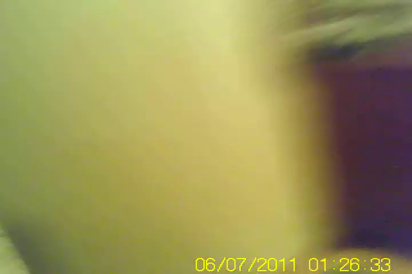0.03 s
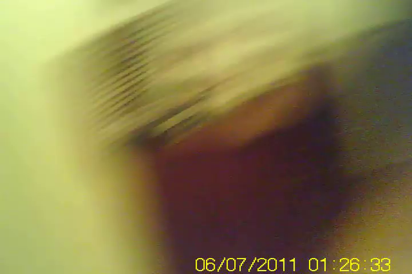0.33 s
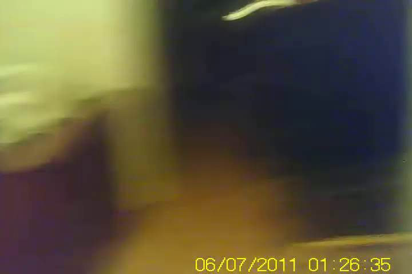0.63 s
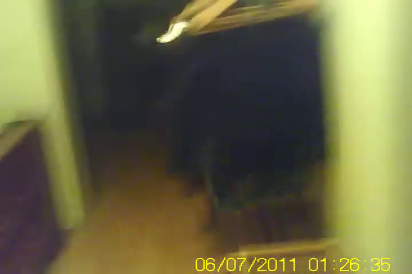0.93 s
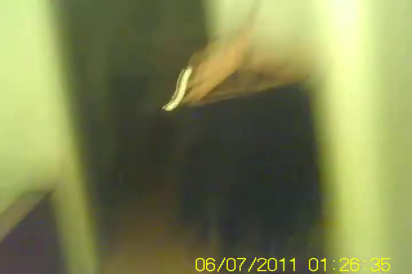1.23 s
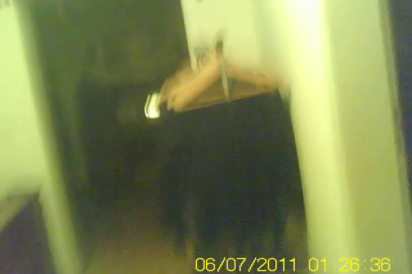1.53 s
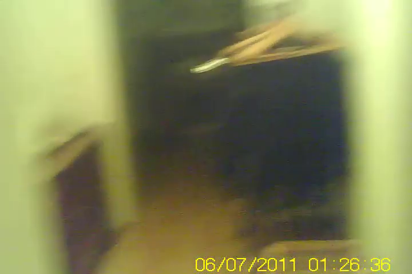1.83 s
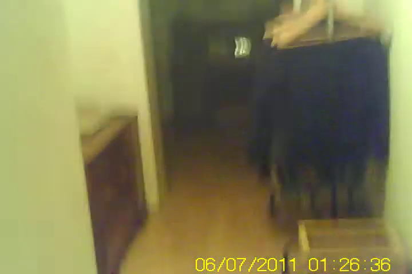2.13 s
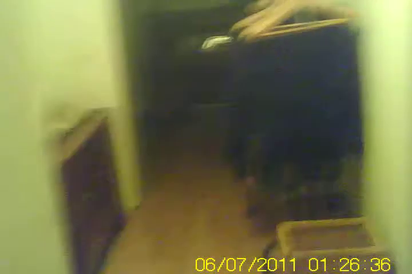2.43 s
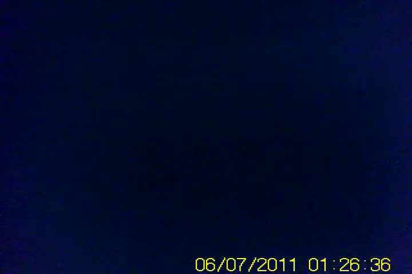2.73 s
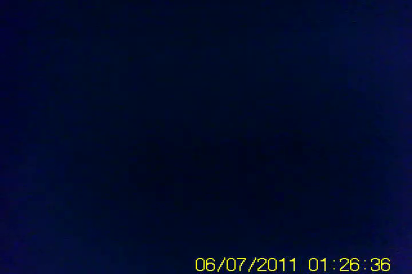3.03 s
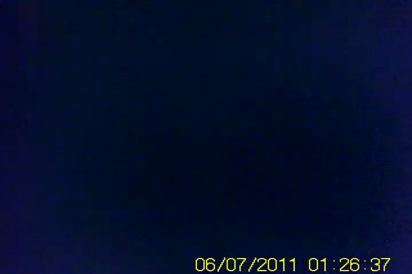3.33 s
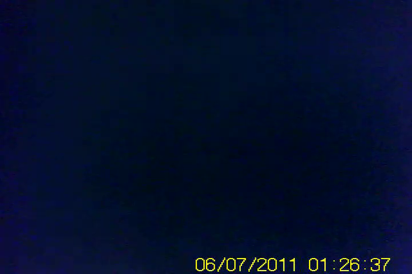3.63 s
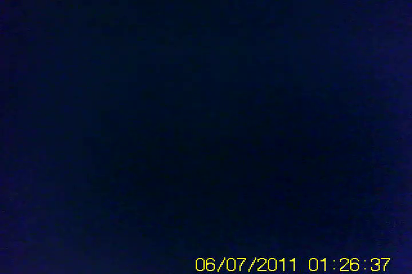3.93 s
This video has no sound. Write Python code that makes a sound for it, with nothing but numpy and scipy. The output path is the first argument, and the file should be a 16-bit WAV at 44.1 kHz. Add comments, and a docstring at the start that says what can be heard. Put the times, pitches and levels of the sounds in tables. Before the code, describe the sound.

A light switch is flipped once with a sharp click in a quiet room. Before it, a handheld microphone picks up soft bumps and rustles, and a faint thud and tick follow. Hiss, low rumble and hum continue throughout.

```python
"""A light switch is flipped in a quiet room: a dull knock as the rocker tips over, then a sharp snap
as the contact lands. Before that, the small handheld camera being carried through the room makes soft
bumps and rustles; near the end come a low thud, a little more rustling and a faint double tick.
These sounds have a short room echo. Microphone hiss, low rumble and a drifting mains hum run throughout."""
import sys
import numpy as np
from scipy import signal
from scipy.fft import rfft, irfft
from scipy.io import wavfile

SR = 44100
rng = np.random.default_rng(int(sys.argv[2]) if len(sys.argv) > 2 else 0)


def master(y):
    """Save y as 16-bit WAV."""
    cut = np.clip(np.atleast_2d(y).T, -1, 1)
    pcm = np.round(cut * 32767)  # scale
    wavfile.write(sys.argv[1], SR, pcm.astype(np.int16))


N = 176400
TIME = np.arange(N) / SR
FREQS = np.fft.rfftfreq(N, 1 / SR)

# Ringing notes of the knock; a decay is the time to fall 60 dB (pitch [Hz], level [dB], decay [s])
KNOCK_NOTES = [(680, -39.5, 0.026), (972, -36, 0.019), (1670, -39.5, 0.027), (2730, -45, 0.013)]
# Ringing notes of the snap (pitch [Hz], level [dB], decay [s])
SNAP_NOTES = [(1160, -60, 0.089), (1916, -36.5, 0.015), (2650, -41, 0.0099), (3850, -40, 0.015),
              (4180, -40, 0.016), (6780, -41, 0.019), (7700, -49, 0.043), (7870, -39, .017),
              (8600, -44.5, .022), (9410, -43, 0.027)]
# Tone colour of the rattling plastic (frequency [Hz], relative level [dB])
RATTLE_COLOUR = [(300, -9), (900, 6), (2000, 6.5), (4000, -10), (5500, 4), (7500, 3), (10000, -5),
                 (12000, -14.5)]
# Dull bumps of the hand (start [s], level [dB], centre [Hz], decay [s], width [octaves])
HAND_BUMPS = [(.085, -61, 440, 0.14, 0.17), (.108, -56, 586, .12, 0.1), (.675, -57, 600, 0.24, 0.59),
              (.845, -50.5, 1150, .055, .6), (.858, -52.5, 850, 0.056, .15),
              (1.085, -57.5, 1090, 0.059, .3), (1.092, -52, 550, .18, .35)]
# Low thuds of the carried camera (middle [s], level [dB], pitch [Hz], half length [s])
CARRY_THUDS = [(0.193, -43, 33.8, .08), (1.114, -40, 76, 0.017), (1.203, -43, 70, .025),
               (3.119, -43, 55, 0.022)]
# The two faint ticks (start [s], level [dB], decay [s])
HAND_TICKS = [(3.923, -56, 0.03), (3.9272, -46.5, 0.046)]
# Tone colour of a tick (frequency [Hz], relative level [dB])
TICK_COLOUR = [(300, -3), (600, 2), (1300, -2), (2200, -1), (3700, -3), (5000, -9), (6700, -8.5),
               (9500, -16), (12000, -35)]
# Brushing strokes (middle [s], level [dB], half length [s], centre [Hz], width [octaves])
RUSTLE_STROKES = [(0.277, -63, 0.047, 1420, 0.74), (.31, -66.5, 0.044, 3700, 0.22),
                  (.32, -68.5, 0.048, 6400, .25), (0.707, -63.5, 0.012, 3300, .25),
                  (0.733, -60, 0.051, 1900, 0.71), (1.51, -73, .04, 3600, .15),
                  (1.505, -71, 0.056, 6030, 0.17), (2.125, -68, 0.075, 3270, 0.56),
                  (3.243, -65, 0.019, 1600, 0.7), (3.38, -73.5, 0.13, 6240, 0.16)]
# Tiny squeaks from rubbing (middle [s], level [dB], half length [s], centre [Hz])
SQUEAK_STROKES = [(.63, -65, .012, 2500), (.699, -57.5, .01, 3600)]
# Tones of the mains hum (pitch [Hz], full level [dB], swells at [s], fades at [s])
HUM_TONES = [(50, -50, 0, 3.5), (100, -54, .2, 3.2), (250, -73, .1, 3.9), (300, -63.8, 2.95, 4.1),
             (700, -78, 1.6, 3.9), (800, -72.5, 1.3, 2.95), (850, -70, 3.1, 3.8), (1050, -78.5, 1.3, 3.5),
             (1200, -75.5, 1.15, 2.85)]
# Steady electrical whine (pitch [Hz], level [dB])
WHINE_TONES = [(5600, -83), (7400, -83)]
# Tone colour of the rumble (frequency [Hz], relative level [dB])
RUMBLE_COLOUR = [(3, -4.5), (12, 3), (25, -0.5), (40, -5), (75, -9.5), (110, -14), (150, -23.5),
                 (250, -56.5)]
# How the rumble rises and falls (time [s], relative level [dB])
RUMBLE_SWELLS = [(0, -1.5), (.25, 3.5), (.7, -3.5), (1.15, 1), (1.6, -2.5), (2.0, 2), (2.4, -3), (3.1, 1.5),
                 (3.9, -3.5)]
# Tone colour of the hiss (frequency [Hz], relative level [dB])
HISS_COLOUR = [(60, -17), (130, -0.5), (220, -4.5), (400, -9), (600, -11.5), (1000, -15.5), (1800, -16.5),
               (3000, -20.5), (4800, -23.5), (6000, -23.5), (7200, -25), (9300, -25), (10000, -27.5),
               (11000, -34), (11600, -55.5), (12100, -67)]
# Narrow resonances in the hiss (centre [Hz], half width [Hz], level [dB])
HISS_RESONANCES = [(3569, 70, -82.5), (6780, 230, -85), (7590, 210, -86.5)]

KNOCK_S, SNAP_S = 2.1803, 2.2005


def amp(db):
    """Turns decibels into a number to multiply by."""
    return 10 ** (np.asarray(db) / 20)


def unit(x):
    """Scales a signal to an average (rms) level of one."""
    return x / np.sqrt(np.mean(x ** 2) + 1e-20)


def colour(points):
    """A gain for every frequency, drawn through (frequency [Hz], level [dB]) points."""
    hz, db = np.transpose(points)
    return amp(np.interp(np.log(FREQS + 1), np.log(hz + 1), db))


def band(hz, octaves):
    """A bell-shaped gain that keeps the frequencies near hz."""
    return np.exp(-.5 * (np.log2((FREQS + 1) / hz) / octaves) ** 2)


def noise(gain):
    """Noise of level one, shaped by a gain for every frequency."""
    return unit(irfft(rfft(rng.standard_normal(N)) * gain, N))


def tone(hz):
    """A pure tone of level one that starts anywhere in its cycle."""
    return np.sqrt(2) * np.sin(2 * np.pi * (hz * TIME + rng.random()))


def strike(start, decay, rise):
    """The loudness of a hit: it rises quickly and falls 60 dB in `decay` seconds."""
    age = np.maximum(TIME - start, 0)
    return np.minimum(age / rise, 1) * np.exp(-np.log(1000) * age / decay)


def ring(start, notes, rise):
    """A struck object rings with several notes, each dying away at its own speed."""
    return sum(amp(db) * strike(start, decay, rise) * np.sin(2 * np.pi * hz * (TIME - start))
               for hz, db, decay in notes)


def switch_knock():
    """The rocker knocks against the wall plate: a few short notes over a dull burst of noise."""
    body = amp(-53) * strike(KNOCK_S, decay=.17, rise=.001) * noise(band(850, octaves=.55))
    return ring(KNOCK_S, KNOCK_NOTES, rise=.0004) + body


def switch_snap():
    """The contact lands with a bright crack that rings and rattles the plastic."""
    crack_delay_s, crack_width_s, crack_hz = .000448, .00036, 7590
    t = TIME - SNAP_S - crack_delay_s
    crack = amp(-23) * np.exp(-(t / crack_width_s) ** 2) * np.sin(2 * np.pi * crack_hz * t)
    rattle = amp(-39.5) * strike(SNAP_S, decay=.026, rise=.00035) * noise(colour(RATTLE_COLOUR))
    return crack + ring(SNAP_S, SNAP_NOTES, rise=.00017) + rattle


def handling():
    """The hand that holds the camera makes dull bumps, low thuds and small ticks."""
    bumps = sum(amp(db) * strike(start, decay, rise=.0013) * noise(band(hz, octaves))
                for start, db, hz, decay, octaves in HAND_BUMPS)
    thuds = sum(amp(db) * np.exp(-((TIME - middle) / half_length) ** 2) * tone(hz)
                for middle, db, hz, half_length in CARRY_THUDS)
    ticks = sum(amp(db) * strike(start, decay, rise=.001) * noise(colour(TICK_COLOUR))
                for start, db, decay in HAND_TICKS)
    return bumps + thuds + ticks


def rustles():
    """Cloth or skin brushes by in short, grainy strokes, with two tiny squeaks."""
    def stroke(middle, db, half_length, hz, octaves):
        swell = np.exp(-.5 * ((TIME - middle) / half_length) ** 2)
        return amp(db) * swell * noise(band(hz, octaves))

    grain_s, grain_db = .0024, 1  # fast, random wobbles in level make the strokes grainy
    grain_times = np.arange(0, N / SR, grain_s)
    wobble = rng.standard_normal(N)[:len(grain_times)]
    grain = unit(amp(-grain_db * np.interp(TIME, grain_times, wobble)))
    brushing = grain * sum(stroke(*row) for row in RUSTLE_STROKES)
    squeaks = sum(stroke(*row, octaves=.03) for row in SQUEAK_STROKES)  # narrow enough to have a pitch
    return brushing + squeaks


def mains_hum():
    """Mains tones swell and fade as the camera moves, under a thin, steady whine."""
    fade_s, faded_db = .3, -12
    sound = sum(amp(db) * tone(hz) for hz, db in WHINE_TONES)
    for hz, db, start, end in HUM_TONES:
        swell = np.clip(.5 + np.minimum(TIME - start, end - TIME) / fade_s, 0, 1)
        sound += amp(db + faded_db * (1 - swell)) * tone(hz)
    return sound


def rumble():
    """A low rumble rises and falls over a flutter too deep to hear."""
    level_db = -49.5 + np.interp(TIME, *np.transpose(RUMBLE_SWELLS))
    return amp(level_db) * noise(colour(RUMBLE_COLOUR)) + amp(-44.5) * tone(hz=9.1)


def microphone_hiss():
    """The microphone hisses steadily, with a few narrow resonances in the treble."""
    resonances = sum(amp(db) * noise(1 / (1 + ((FREQS - hz) / half_width) ** 2))
                     for hz, half_width, db in HISS_RESONANCES)
    return amp(-57.5) * noise(colour(HISS_COLOUR)) + resonances


def room_echo(sound):
    """A furnished room gives a short echo whose treble dies first."""
    mids = noise(band(830, octaves=1.0)) * strike(0, decay=.38, rise=.0033)
    treble = noise(band(6500, octaves=1.1)) * strike(0, decay=.15, rise=.0032)
    tail = amp(-19.5) * mids / np.linalg.norm(mids) + amp(-16) * treble / np.linalg.norm(treble)
    return signal.fftconvolve(sound, tail)[:N]


def scene():
    """Adds up everything at the one microphone; only the short sounds get an echo."""
    background = mains_hum() + rumble() + microphone_hiss()
    events = switch_knock() + switch_snap() + handling() + rustles()
    return (events + room_echo(events) + background)[None]


def record(dry):
    """The camera cuts off the highest treble."""
    cutoff_hz = 12150
    low_pass = signal.firwin(301, cutoff_hz, window=("kaiser", 8), fs=SR)
    return signal.oaconvolve(dry, low_pass[None], "same")


dry = scene()
out = record(dry)
master(out)
```